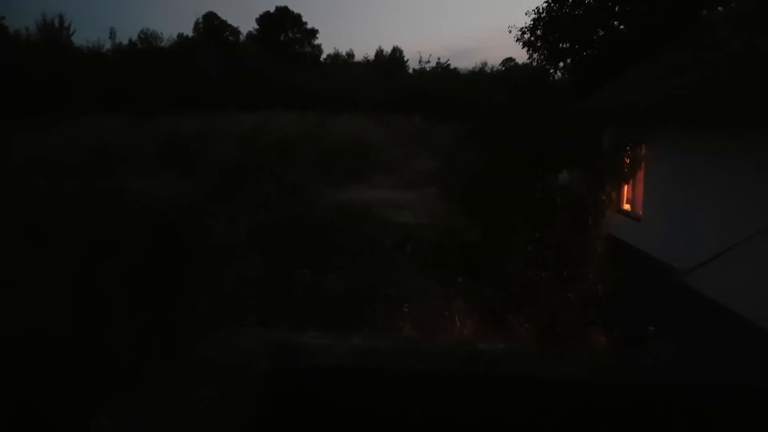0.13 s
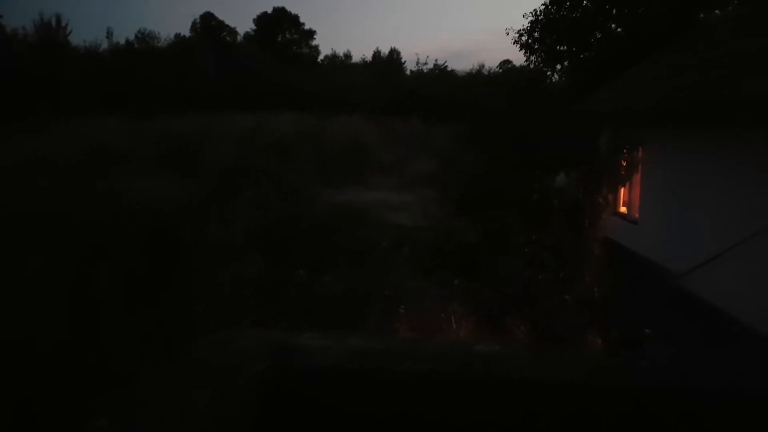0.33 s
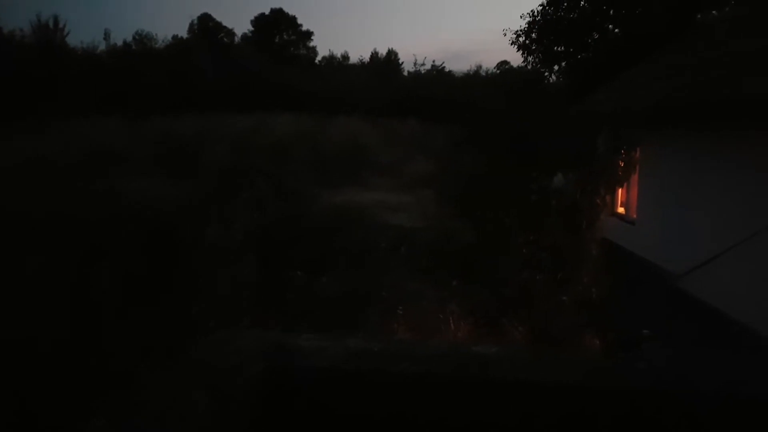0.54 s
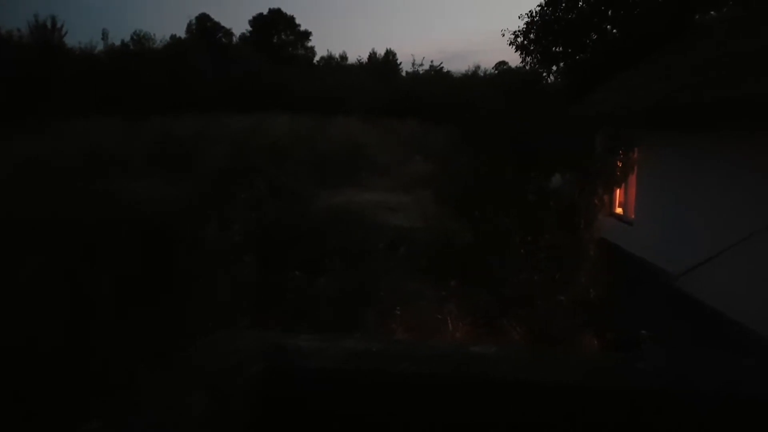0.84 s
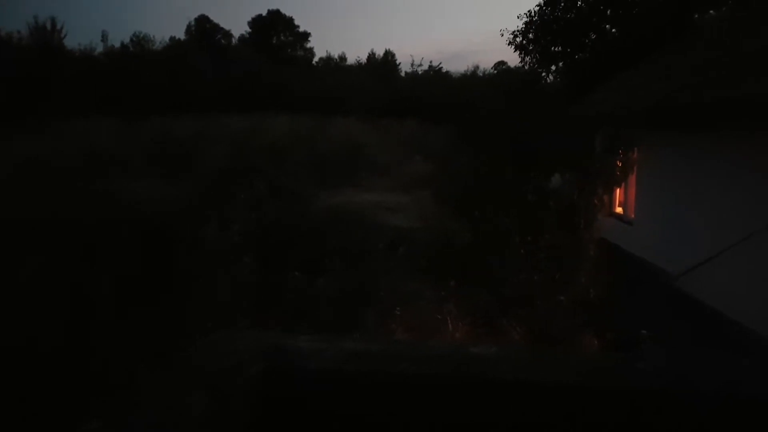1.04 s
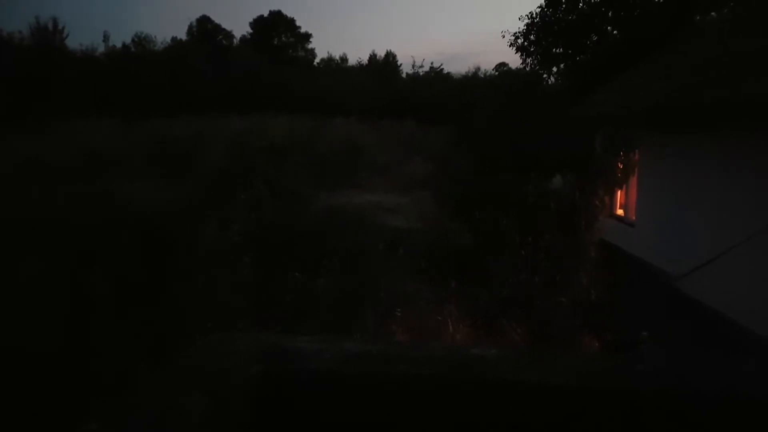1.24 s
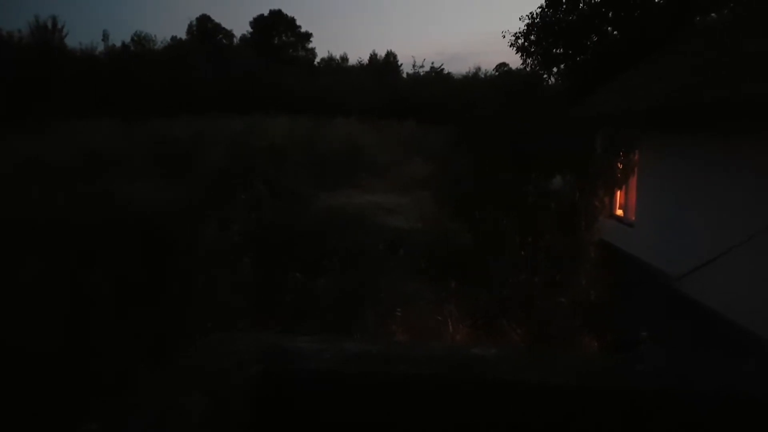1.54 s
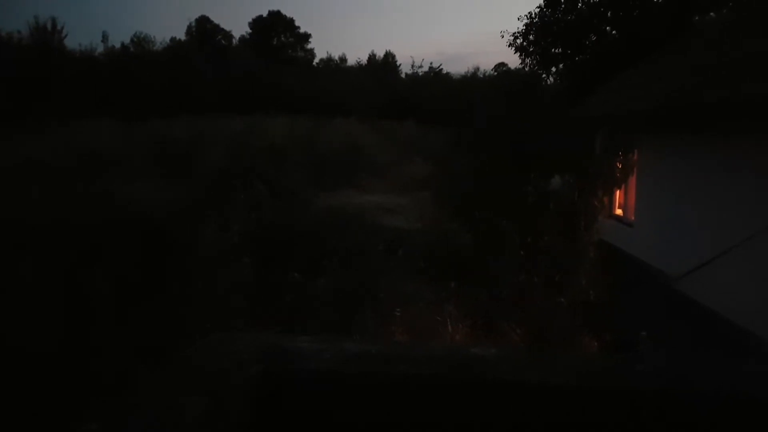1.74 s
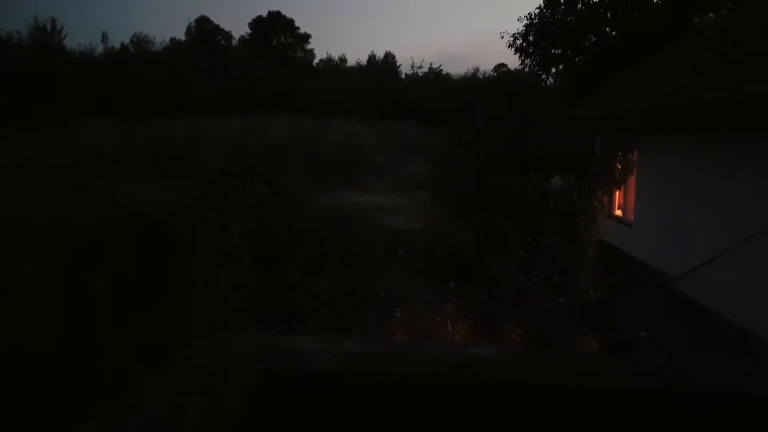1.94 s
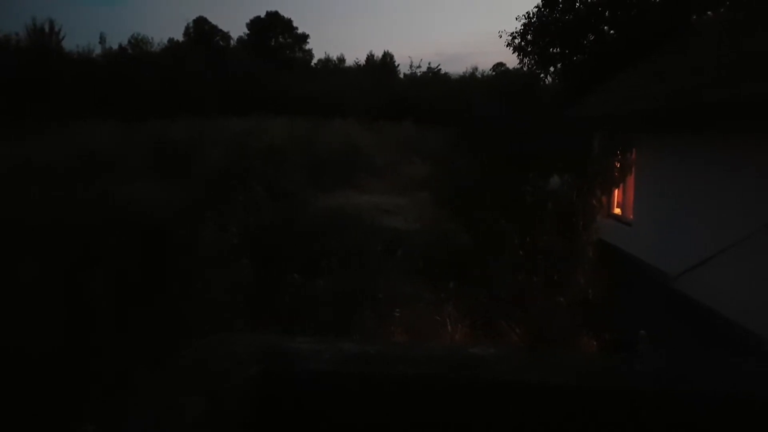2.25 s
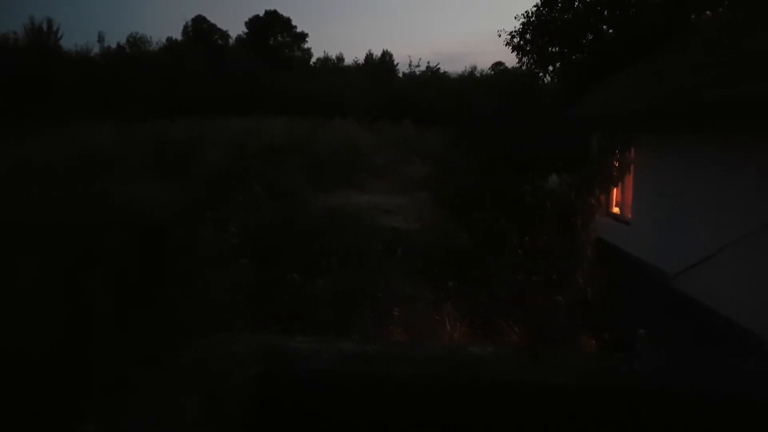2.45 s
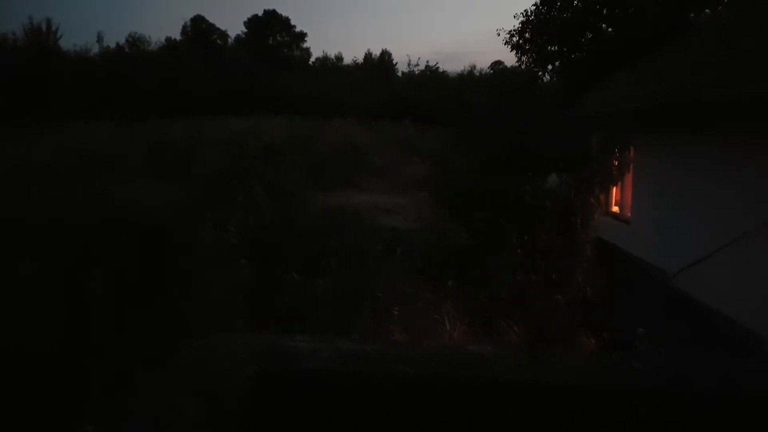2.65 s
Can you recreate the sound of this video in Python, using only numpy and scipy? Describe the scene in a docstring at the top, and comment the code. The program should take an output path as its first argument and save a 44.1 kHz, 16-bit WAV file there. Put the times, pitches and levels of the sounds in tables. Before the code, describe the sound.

Crickets trill in a still evening garden, several taking turns and overlapping above a far chorus. A few tiny, very high insect ticks come and go, while faint hiss, hum and distant rumble fill the background.

```python
"""Crickets in a garden at dusk

Tree crickets trill in overlapping bouts: each closing stroke sets the wings ringing, and the tone is
scattered by trees and reflected by a house wall. Behind them lie a far chorus, a faint machine hum,
a distant rumble and soft hiss. Now and then a bush cricket's wings give a few very high ticks."""
import sys
import numpy as np
from scipy import signal
from scipy.fft import rfft, irfft, next_fast_len
from scipy.io import wavfile
from scipy.ndimage import map_coordinates

SR = 44100
rng = np.random.default_rng(int(sys.argv[2]) if len(sys.argv) > 2 else 0)


def log_audio(samples):
    """Write samples as a 16-bit WAV file to the path given in sys.argv[1]."""
    # one column per channel
    frames = np.atleast_2d(samples).T
    # limit to full scale, then quantise
    limited = np.clip(frames, -1, 1)
    pcm = np.round(limited * 32767).astype(np.int16)
    wavfile.write(sys.argv[1], SR, pcm)


N = 123039

# Tree cricket bouts. Each row: start and end in seconds, pitch in Hz, level in dB, left minus right in dB.
TRILL_BOUTS = [(-.1, 0.244, 2507, -76.5, -22), (-.1, 0.195, 2560, -77, -6), (-.1, 0.316, 2712, -80.5, -6),
               (.27, 0.505, 2524, -81, -2), (0.528, .77, 2517, -74, -13.5), (0.798, 1.037, 2528, -78, -12),
               (1.237, 1.92, 2529, -79, -1), (1.394, 1.887, 2566, -73, -13),
               (1.754, 2.305, 2718, -84.5, 20), (1.953, 2.447, 2500, -89, -10),
               (2.362, 2.9, 2518, -77.5, 1), (2.483, 2.9, 2518, -73.5, -15)]
# Spectrum of the far chorus. Each row: frequency in Hz, relative density in dB.
CHORUS_SPECTRUM = [(2000, -45.5), (2350, -16), (2460, -5.5), (2550, -1.5), (2640, -6.5), (2740, -6),
                   (2840, -16.5), (3000, -28), (3400, -48)]
# Harmonics of the machine. Each row: multiple of the fundamental, relative level in dB.
HUM_HARMONICS = [(2, -11), (3, 0), (4, -11), (6, -13)]
# Course of the hum. Each row: time in seconds, gain in dB added to HUM_DB.
HUM_GAIN = [(0, 2.5), (.15, -15), (.4, 1.5), (1, 1.5), (2.79, 5)]
# Spectrum of the rumble. Each row: frequency in Hz, relative density in dB.
RUMBLE_SPECTRUM = [(15, -12.5), (28, -7), (48, 5), (70, -3), (130, 0.5), (250, -2.5), (450, -9),
                   (900, -20.5), (2000, -50.5)]
# Course of the rumble. Each row: time in seconds, level in dB.
RUMBLE_ENVELOPE = [(0, -82), (.25, -82.5), (.6, -76.5), (1, -72), (2.2, -72), (2.79, -70.5)]
# Spectrum of the hiss. Each row: frequency in Hz, relative density in dB.
HISS_SPECTRUM = [(30, -6.5), (150, -3.5), (350, 4), (700, 1.5), (1300, 1), (2100, -1.5), (3200, -6),
                 (5000, -10), (6500, -13.5), (9500, -16), (11500, -13.5), (13000, -10), (15700, -11)]
# Stereo balance of the hiss. Each row: frequency in Hz, left minus right in dB.
HISS_BALANCE = [(400, 0.5), (740, -3), (1220, 1), (2000, -0.5), (3300, -2.5), (9000, -.5), (15000, -2)]
# Course of the hiss. Each row: time in seconds, level in dB.
HISS_ENVELOPE = [(0, -69.5), (.6, -69.5), (1.1, -70.5), (2.79, -70.5)]
# Bush cricket ticks. Each row: start in seconds, envelope peak in dB.
WING_TICKS = [(.659, -57), (.677, -65), (1.141, -71), (1.157, -67), (1.163, -68), (1.172, -69),
              (1.178, -61), (1.184, -63), (1.189, -66), (1.198, -68), (1.27, -72), (1.276, -69),
              (2.52, -71), (2.538, -66), (2.551, -62), (2.566, -70)]
# Spectrum of a tick. Each row: frequency in Hz, relative density in dB.
TICK_SPECTRUM = [(11000, -47), (13300, -15), (14400, -2), (15700, 2)]

STROKES_PER_S, SOUNDING_SHARE, STROKE_SAG_HZ = 33, .58, 34.9
STROKE_SCATTER_DB, PITCH_SCATTER_HZ, TOOTH_RASP = 0.96, 6.01, 0.13
SWELL_S, FADE_S = 0.054, 0.037
GARDEN_T60_S, WALL_DELAY_S, WALL_DB = .14, .0145, -10
CHORUS_DB, CHORUS_FLUTTER_DB = -75.5, 0.5
HUM_HZ, HUM_DB, HUM_WAVER_DB, HUM_WAVER_RAD = 62.08, -79.5, 3, .3
TICK_T60_S, TOP_HZ = .015, 15780
TIME = np.arange(N) / SR


def amp(db):
    """Amplitude grows tenfold for every 20 dB."""
    return 10 ** (np.asarray(db) / 20)


def unit(x):
    """Normalisation brings a signal to rms 1."""
    return x / np.sqrt(np.mean(x ** 2) + 1e-20)


def along(points, hz):
    """Interpolation joins (Hz, value) points on a logarithmic frequency axis."""
    frequencies, values = np.transpose(points)
    return np.interp(np.log(hz + 1), np.log(frequencies + 1), values)


def curve(rows):
    """Linear interpolation of (seconds, value) points gives one value per sample."""
    return np.interp(TIME, *np.transpose(rows))


def wobble(rate):
    """A spline through random knots, rate of them a second, fluctuates smoothly."""
    knots = rng.standard_normal(int(N * rate / SR) + 4)
    return map_coordinates(knots, [TIME * rate])


def pan(db):
    """A level difference, left minus right, sets direction at constant power."""
    half_db = np.atleast_1d(db) / 2
    gains = np.array([amp(half_db), amp(-half_db)])
    return gains / np.sqrt(np.mean(gains ** 2, axis=0))


def filtered(x, response):
    """A linear filter multiplies the spectrum by its frequency response."""
    size = next_fast_len(N + SR // 2)
    return irfft(rfft(x, size) * response(np.fft.rfftfreq(size, 1 / SR)), size)[..., :N]


def noise(spectrum, coherence=0):
    """Filtering colours stereo noise of rms 1; coherence is the share of power common to both sides."""
    white = rng.standard_normal((3, N))
    stereo = np.sqrt(1 - coherence) * white[:2] + np.sqrt(coherence) * white[2]
    return unit(filtered(stereo, lambda hz: amp(along(spectrum, hz))))


def garden(x, wet_db):
    """Scattering by foliage and walls adds a short exponential tail, different on each side."""
    t = np.arange(SR // 2) / SR
    tail = rng.standard_normal((2, len(t))) * amp(-60 * t / GARDEN_T60_S)
    tail /= np.linalg.norm(tail[0])
    return x + amp(wet_db) * signal.fftconvolve(x[None], tail, axes=1)[:, :N]


def trill(start, end, pitch_hz):
    """Stridulation: each closing rings the wings in a short, falling tone that the wall reflects."""
    cycle = STROKES_PER_S * TIME + rng.random() + 0.059 * wobble(4)
    progress = np.minimum(cycle % 1 / SOUNDING_SHARE, 1)  # stays at 1 in the gap between strokes
    strength, detune = rng.standard_normal((2, 256))[:, np.floor(cycle).astype(int)]  # per stroke
    hz = pitch_hz + PITCH_SCATTER_HZ * detune - STROKE_SAG_HZ * (progress - .5)
    rasp = 1 + TOOTH_RASP * wobble(300)
    stroke = np.sin(np.pi * progress) * amp(STROKE_SCATTER_DB * strength) * rasp
    bout = np.clip((TIME - start) / SWELL_S, 0, 1) * np.clip((end - TIME) / FADE_S + .5, 0, 1)
    song = bout * stroke * np.sin(2 * np.pi * np.cumsum(hz) / SR)
    echo = np.pad(song, (round(WALL_DELAY_S * SR), 0))[:N]
    heard = garden(song + amp(WALL_DB) * echo, wet_db=-3.5)
    return heard * np.linalg.norm(bout) / np.linalg.norm(heard, axis=1, keepdims=True)  # rms 1 in a bout


def tree_crickets():
    """The bouts of the nearer singers superpose, each from its own direction."""
    return sum(amp(db) * pan(pan_db) * trill(start, end, hz) for start, end, hz, db, pan_db in TRILL_BOUTS)


def far_chorus():
    """Many distant crickets add incoherently into a fluttering narrow band of noise."""
    flutter = amp(CHORUS_FLUTTER_DB * np.array([wobble(90), wobble(90)]))
    return amp(CHORUS_DB) * pan(db=-5) * unit(flutter * noise(CHORUS_SPECTRUM))


def machine_hum():
    """A far machine radiates harmonics, each wavering in amplitude and phase on its way."""
    phase = 2 * np.pi * HUM_HZ * TIME
    hum = np.zeros((2, N))
    for side in hum:
        for order, db in HUM_HARMONICS:
            level = amp(db + HUM_WAVER_DB * wobble(6))
            side += level * np.sin(order * phase + HUM_WAVER_RAD * wobble(5))
    return amp(HUM_DB + curve(HUM_GAIN)) * pan(db=-5) * unit(hum)


def distant_rumble():
    """Low-frequency noise, partly coherent between the sides, swells in the distance."""
    return amp(curve(RUMBLE_ENVELOPE)) * pan(db=-0.5) * noise(RUMBLE_SPECTRUM, coherence=0.37)


def hiss():
    """Still evening air and microphone self-noise give an incoherent broadband floor."""
    balanced = filtered(noise(HISS_SPECTRUM), lambda hz: pan(along(HISS_BALANCE, hz)))
    return amp(curve(HISS_ENVELOPE)) * balanced


def bush_cricket():
    """Wing ticks are strongly damped transients near the upper limit of hearing."""
    envelope = sum((TIME >= start) * amp(db - 60 * np.abs(TIME - start) / TICK_T60_S)
                   for start, db in WING_TICKS)
    lowest_hz = TICK_SPECTRUM[0][0]
    ticks = filtered(envelope * noise(TICK_SPECTRUM)[0], lambda hz: hz > lowest_hz)
    return pan(db=-5) * garden(ticks, wet_db=-3)


def scene():
    """By superposition, the pressures of the crickets and the quiet background add."""
    crickets = tree_crickets() + far_chorus() + bush_cricket()
    return crickets + machine_hum() + distant_rumble() + hiss()


def record(dry):
    """An ideal low-pass filter removes everything above the band limit."""
    return filtered(dry, lambda hz: hz < TOP_HZ)


dry = scene()
out = record(dry)
log_audio(out)
```